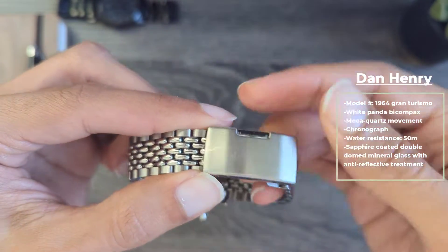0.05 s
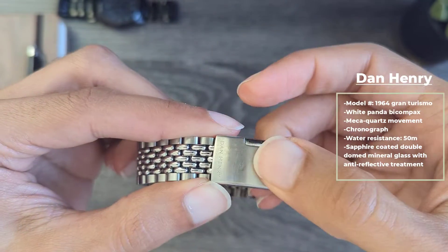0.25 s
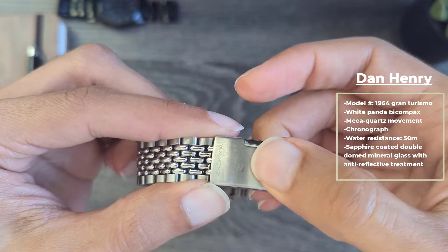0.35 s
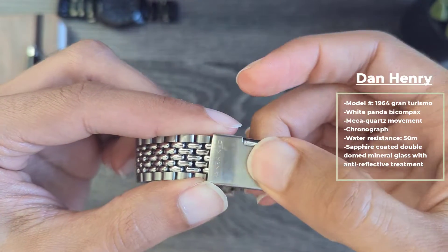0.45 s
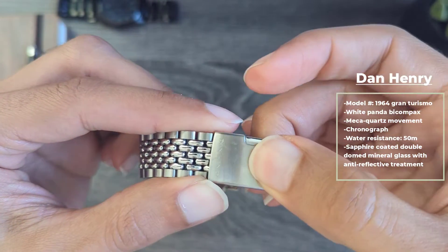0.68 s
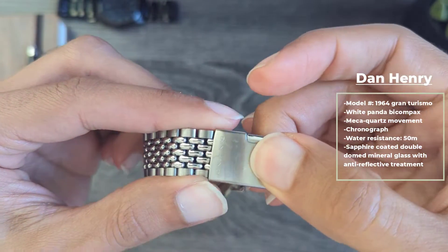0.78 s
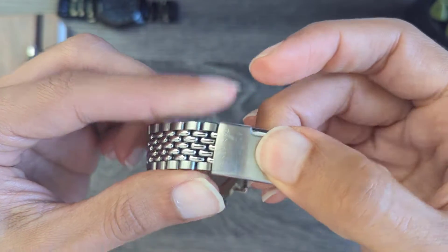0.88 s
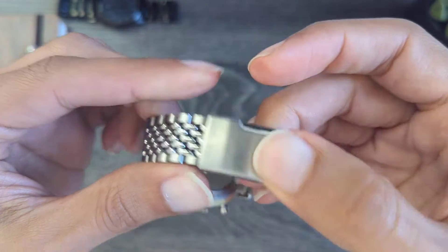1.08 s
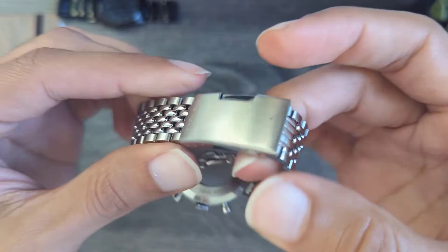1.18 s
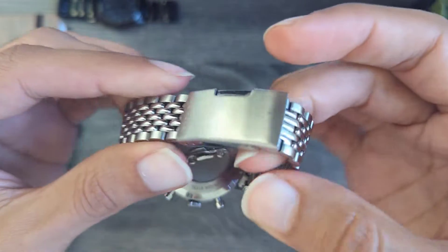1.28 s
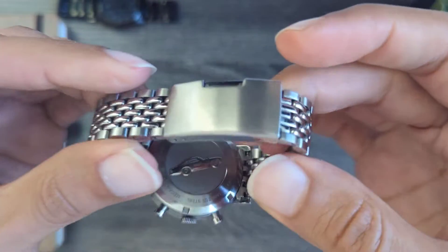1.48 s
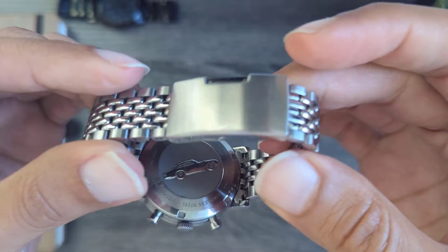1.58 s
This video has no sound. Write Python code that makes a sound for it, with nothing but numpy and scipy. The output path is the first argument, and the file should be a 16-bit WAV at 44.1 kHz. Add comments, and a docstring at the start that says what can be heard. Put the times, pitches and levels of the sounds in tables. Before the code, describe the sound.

Close to the microphone, a metal watch clasp clicks twice, the second snap sharper and carrying a soft thump. The links then tick and softly slide, while a small, dry room hums faintly.

```python
"""A motor, the mains and moving air hum faintly throughout, in a small, dry room.
Close by, a steel watch clasp is pressed shut: at 0.2 s its folding blade scrapes and latches.
A bracelet link ticks, then at 0.4 s the safety flap snaps over the blade with a puff of pressure.
More links tick at 0.6 s, and just after 0.9 s they slide and tick softly as the fingers let go."""
import sys
import numpy as np
from scipy import signal
from scipy.fft import rfft, irfft, next_fast_len
from scipy.io import wavfile

SR = 44100
rng = np.random.default_rng(int(sys.argv[2]) if len(sys.argv) > 2 else 0)


def output_pcm(signal):
    """Save a mono or channel-first signal as 16-bit PCM at the path in sys.argv[1].

    Samples are clipped to [-1, 1] before scaling.
    """
    pcm = np.clip(np.atleast_2d(signal).T, -1, 1) * 32767
    wavfile.write(sys.argv[1], SR, np.round(pcm).astype(np.int16))


N = 72765
TIME = np.arange(N) / SR
FFT_SIZE = next_fast_len(N + SR // 20, True)
FREQS = np.arange(FFT_SIZE // 2 + 1) * SR / FFT_SIZE


def from_db(db):
    """Turn decibels into a number to multiply a sound by."""
    return 10 ** (np.asarray(db) / 20)


def at_hz(curve, freqs=FREQS):
    """Read values between the rows of a table, on a musical (log) pitch scale."""
    hz, value = np.transpose(curve)
    return np.interp(np.log(freqs + 1), np.log(hz), value)


def colour(x, curve, size=1024):
    """Turn each pitch up or down along a curve of (pitch_hz, gain_db) rows."""
    gain = from_db(at_hz(curve, np.fft.rfftfreq(size, 1 / SR)))
    cepstrum = irfft(np.log(gain))
    # this fold keeps the filter from sounding before its input (minimum phase)
    fold = 1 + np.sign(np.arange(size)) * np.sign(size / 2 - np.arange(size))
    response = irfft(np.exp(rfft(cepstrum * fold)))
    return signal.oaconvolve(x, response)[:len(x)]


def band(x, low_hz, high_hz):
    """Keep the sound between two pitches."""
    return signal.sosfilt(signal.butter(6, [low_hz, high_hz], "band", fs=SR, output="sos"), x)


def ring(x, hz, width_hz):
    """Ring at one pitch; the narrower the width, the longer it rings."""
    r = np.exp(-np.pi * width_hz / SR)
    feedback = [1, -2 * r * np.cos(2 * np.pi * hz / SR), r * r]
    return signal.lfilter(np.array([1, 0, -1]) * (1 - r * r) / 2, feedback, x + 1e-18)


# the tone of moving air: pitch_hz, relative_level_db
AIR_COLOUR = [(20, -5.5), (40, 7), (90, -17.5), (170, -11), (280, -21), (420, -21.5), (560, -24.5),
              (750, -31), (1000, -33.5), (1500, -44), (2100, -49.5), (2600, -46.5), (3300, -54.5),
              (8000, -58), (16000, -67)]
# how alike left and right are: pitch_hz, likeness (0 to 1)
AIR_LIKENESS = [(30, 0.26), (180, 1), (550, 0.98), (1650, 0.78), (5000, 0.12), (15000, .05)]

def air(level_db=-61.5):
    """Moving air makes a dull noise, most alike on both sides in the upper bass."""
    shared, opposite = rfft(rng.standard_normal((2, FFT_SIZE)))
    alike = at_hz(AIR_LIKENESS)
    both = np.sqrt((1 + alike) / 2) * shared + np.sqrt((1 - alike) / 2) * opposite * [[1], [-1]]
    gain = from_db(at_hz(AIR_COLOUR))
    gain /= np.sqrt(np.mean(gain ** 2))
    return from_db(level_db) * irfft(both * gain, FFT_SIZE)[:, :N]


# the motor's tones: multiple (of motor_hz), level_db
MOTOR_TONES = [(1, -53.5), (2, -60.5), (3, -71.5), (5, -82.5), (6, -89.5), (7, -80.5), (11, -90),
               (12, -90.5), (13, -95), (15, -81), (16, -83.5), (17, -87), (18, -88.5), (19, -98),
               (21, -100), (32, -105), (33, -106), (36, -107), (41, -108), (42, -97), (43, -106),
               (44, -108), (45, -101)]
# the mains and other steady tones: pitch_hz, level_db
STEADY_TONES = [(72, -59.5), (120, -59), (240, -77)]

def hum(motor_hz=58.77, buzz_above_hz=810, dip_s=0.98):
    """A motor buzzes once a turn, just under mains speed, so its second tone throbs against the mains."""
    t = TIME - dip_s  # the two tones nearly cancel at dip_s
    motor = 0
    for multiple, db in MOTOR_TONES:
        hz = multiple * motor_hz
        # the high tones stay nearly in step, which makes the buzz
        scatter_turns = 0.21 if hz > buzz_above_hz else float(multiple > 2)
        motor += from_db(db) * np.cos(2 * np.pi * (hz * t + scatter_turns * rng.standard_normal()))
    steady = sum(from_db(db) * np.cos(2 * np.pi * hz * t) for hz, db in STEADY_TONES)
    return np.sqrt(2) * (motor - steady)


# the tone of the room's echo: pitch_hz, gain_db
ECHO_COLOUR = [(300, -24.5), (1500, -23.5), (2100, -20), (3000, -14), (4100, -17.5), (5300, -10), (6900, 0),
               (8500, -3.5), (10000, -6), (12800, -4), (14000, -12.5), (16000, -16)]

def room_echo(x, low_fade_s=0.22, high_fade_s=0.2, split_hz=10000, rise_s=0.003):
    """The room adds a short wash of echo, different on each side; the highest part dies first."""
    tail, t = 0, TIME[:SR // 2]
    for kind, fade_s in (("low", low_fade_s), ("high", high_fade_s)):
        split = signal.butter(4, split_hz, kind, fs=SR, output="sos")
        noise = signal.sosfilt(split, rng.standard_normal((2, len(t))))
        shape = (1 - np.exp(-t / rise_s)) * from_db(-60 * t / fade_s)
        tail += noise * shape / np.linalg.norm(shape)
    return signal.fftconvolve(colour(x, ECHO_COLOUR)[None], tail, axes=1)[:, :N]


# the left side compared with the right: pitch_hz, gain_db
LEFT_COLOUR = [(300, -7), (1000, -11.5), (2000, -7.5), (3800, -8.5), (7500, -4.5), (15000, 1.9)]

def at_microphone(x, lag_s=0.000037):
    """The microphone's left opening is further away, so sound gets there later and mostly weaker."""
    delay = np.exp(-2j * np.pi * FREQS * lag_s)
    left = irfft(rfft(colour(x, LEFT_COLOUR), FFT_SIZE) * delay, FFT_SIZE)[:N]
    return np.array([left, x])


def contact(start_s, db, length_s, release_s=0.00017, size=1024):
    """Steel grinds on steel for an instant: a burst of grit that holds, then dies."""
    shape = np.exp(-np.maximum(TIME[:size] - length_s, 0) / release_s)
    limit = 2 * shape / np.linalg.norm(shape)
    grit = rng.standard_normal(size) * shape
    for _ in range(6):
        grit = irfft(np.exp(1j * np.angle(rfft(grit))))  # make all pitches equally strong
        grit = np.clip(grit, -limit, limit)  # keep the burst short
    force, start = np.zeros(N), int(start_s * SR)
    force[start:start + size] = from_db(db) * grit / np.linalg.norm(grit)
    return force


# how the rustle swells and fades: time_s, level_db
RUSTLE_LEVELS = [(.90, -112), (.93, -85.5), (.95, -92), (.97, -80.5), (1.0, -112)]

def link_rustle():
    """Links slide over each other with a faint, grainy hiss as the fingers let go."""
    grit = band(rng.standard_normal(N) ** 3, low_hz=3183, high_hz=11500)
    times, db = np.transpose(RUSTLE_LEVELS)
    swell = from_db(np.interp(TIME, times, db)) * (TIME > times[0]) * (TIME < times[-1])
    return grit / grit.std() * swell


# each tick (the row just after 0.639 s is that tick's echo off the table): start_s, level_db, length_s,
# pitch_hz, width_hz, crack_db, low_hz, high_hz
LINK_TICKS = [(0.3159, -10.5, .0012, 7650, 392, -18, 199, 13800),
              (0.6390, -9, 0.00027, 10650, 885, -24, 200, 17000),
              (0.641, -26.5, .0005, 10500, 1490, -12, 1500, 14000),
              (0.9374, -39.5, .0005, 6900, 1200, -7, 4500, 11370),
              (0.9404, -41, .0012, 7000, 1500, -6, 4500, 11000),
              (0.9568, -57, .0005, 7000, 1000, -11, 4400, 11000),
              (0.9672, -33, .0003, 7100, 700, -4, 4300, 12100)]
# the tone of a link's sharp crack: pitch_hz, gain_db
LINK_CRACK = [(200, -2.5), (900, -6.5), (1800, -22.5), (2800, -10), (3800, -15), (5300, -6.5), (9000, -1),
              (13000, -1.5), (16000, -12)]

def link_ticks(rattle_db=-12.5, rattle_fade_s=0.032, size=4096):
    """Each link ticks with its own ring, plus a lower one they all share, and shakes its neighbours."""
    out = np.zeros(N)
    for start_s, db, length_s, hz, width_hz, crack_db, low_hz, high_hz in LINK_TICKS:
        rattle = rng.standard_normal(size) * from_db(-60 * TIME[:size] / rattle_fade_s)
        rattle *= from_db(db + rattle_db) / np.linalg.norm(rattle)
        force = contact(0, db, length_s)[:size] + rattle
        crack = colour(force, LINK_CRACK) + ring(force, hz=5350, width_hz=250)
        tick = ring(force, hz, width_hz) + from_db(crack_db) * crack
        start = int(start_s * SR)
        out[start:start + size] += band(tick, low_hz, high_hz)
    return out


# a swell of pressure and its sharp edge: level_db, rise_s
PUFF_PARTS = [(-12, 0.0065), (-26, .0004)]

def puff(start_s=0.4156, leak_hz=5.2):
    """The snap's pressure hits the right side and swings back as it leaks away: a soft thump."""
    age = np.maximum(TIME - start_s, 0)
    pressure = sum(from_db(db) * (1 - np.exp(-age / rise_s)) for db, rise_s in PUFF_PARTS)
    thump = signal.sosfilt(signal.butter(2, leak_hz, "high", fs=SR, output="sos"), pressure)
    return np.array([np.zeros(N), thump])


def steel_part(force, rings, crack):
    """A struck steel part cracks and rings briefly, damped by the fingers."""
    ringing = sum((-1) ** k * from_db(db) * ring(force, hz, width_hz)
                  for k, (hz, width_hz, db) in enumerate(rings))
    return ringing + colour(force, crack)


# the blade meets its catch: start_s, level_db, length_s
BLADE_CONTACTS = [(0.2125, -21.5, .002), (0.2152, -0.5, 0.0033), (0.2187, 10, .0008), (0.2222, 1, .0005),
                  (0.2295, -14, .003)]
# the pitches the blade rings at: pitch_hz, width_hz, gain_db
BLADE_RINGS = [(249.6, 70, -19), (594, 100, -20.5), (2356, 150, -21.5), (2790, 150, -19.5),
               (4740, 450, -11), (5510, 251.7, -4), (6760, 310, -0.5), (8000, 380, 0.5), (10100, 880, -6.5),
               (11200, 500, -4), (12500, 510, -0.5), (13600, 180, -18), (15000, 220, -19)]
# the tone of the blade's crack: pitch_hz, gain_db
BLADE_CRACK = [(100, -33), (250, -25.5), (600, -23), (1200, -34.5), (2500, -27.5), (4500, -26),
               (8000, -11.5), (12000, -19.5), (16000, -33)]

def blade_latch():
    """The blade scrapes over its catch and latches; gives the sound and the force behind it."""
    force = sum(contact(*row) for row in BLADE_CONTACTS)
    return steel_part(force, BLADE_RINGS, BLADE_CRACK), force


# the flap touches, snaps and settles: start_s, level_db, length_s
FLAP_CONTACTS = [(0.4128, -7, .0015), (0.4147, 18, .0008), (0.4253, -5, .0012)]
# the pitches the flap rings at: pitch_hz, width_hz, gain_db
FLAP_RINGS = [(2820, 420, -15), (3550, 300.7, -13), (5410, 350, -15), (5830, 150, -14), (6640, 280, 1),
              (7295, 400, -1), (7910, 270, -6.5), (8410, 170, -2.5), (8878, 200, -2.5), (9700, 200, -12.5),
              (10400, 250, -13.5), (11430, 380, -1), (12855, 280, -2), (15240, 600, -13), (6740, 12, -10)]
# the tone of the flap's crack: pitch_hz, gain_db
FLAP_CRACK = [(100, -36.5), (500, -33), (700, -24.5), (1100, -26), (1800, -26), (2150, -40.5), (2700, -25),
              (4300, -27), (7000, -24), (12000, -24), (16000, -26.5)]

def flap_snap():
    """The safety flap snaps home over the blade; gives the sound and the force behind it."""
    force = sum(contact(*row) for row in FLAP_CONTACTS)
    return steel_part(force, FLAP_RINGS, FLAP_CRACK), force


def scene():
    """The clasp and links sound close by, over their echo and the faint background."""
    blade, blade_force = blade_latch()
    flap, flap_force = flap_snap()
    links = link_ticks() + link_rustle()
    # the room hears the clasp from all sides, so it gets the even tone of the bare forces
    blade_far = band(blade_force + 1e-18, low_hz=200, high_hz=12800)
    into_room = from_db(-23) * blade_far + from_db(-18.5) * flap_force + from_db(-29) * links
    return at_microphone(blade + flap + links) + puff() + room_echo(into_room) + hum() + air()


def record(dry):
    """Cut the very highest pitches steeply."""
    cutoff_hz = 16100
    return signal.sosfilt(signal.ellip(10, .1, 80, cutoff_hz, fs=SR, output="sos"), dry)


dry = scene()
out = record(dry)
output_pcm(out)
```